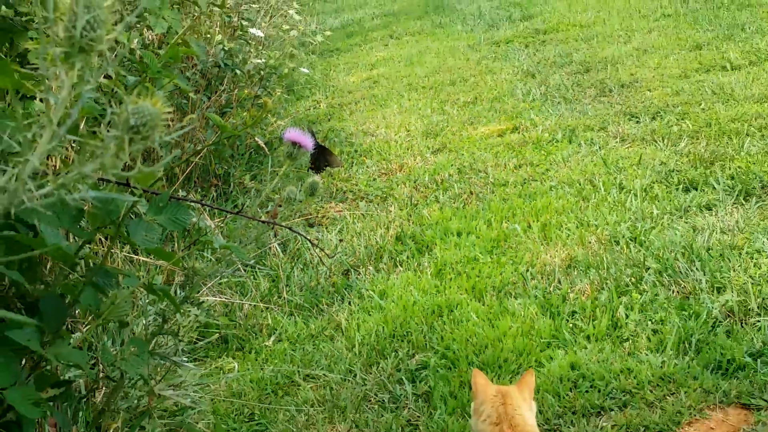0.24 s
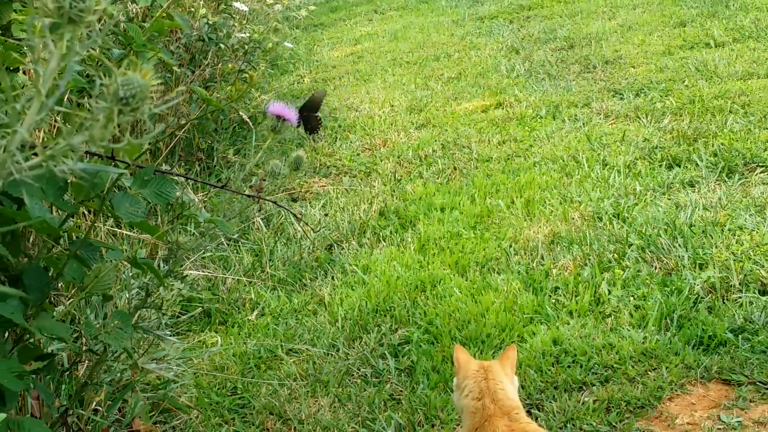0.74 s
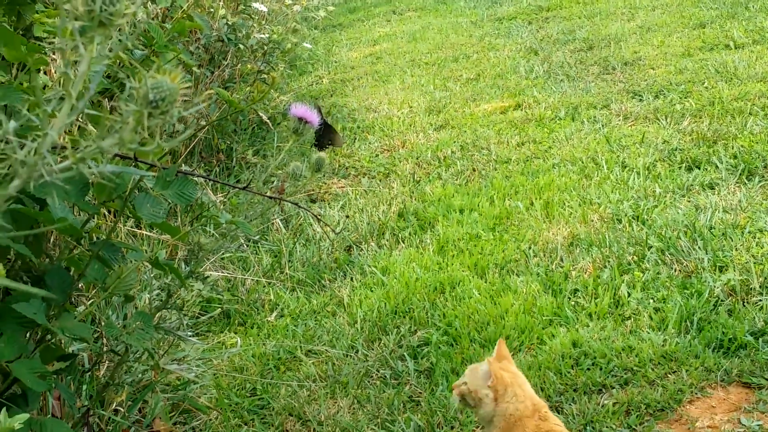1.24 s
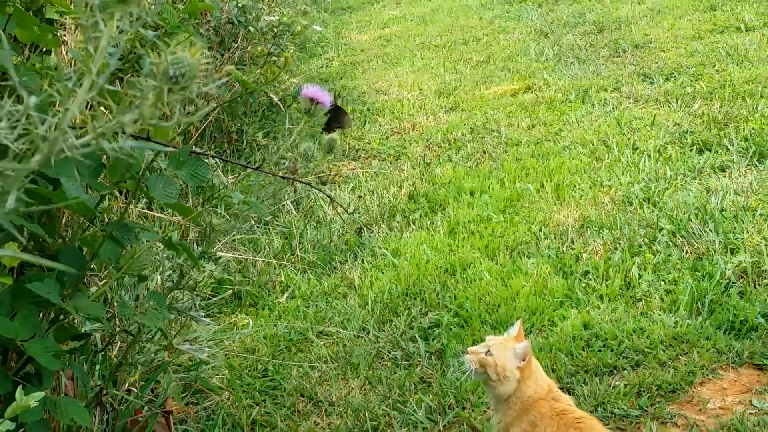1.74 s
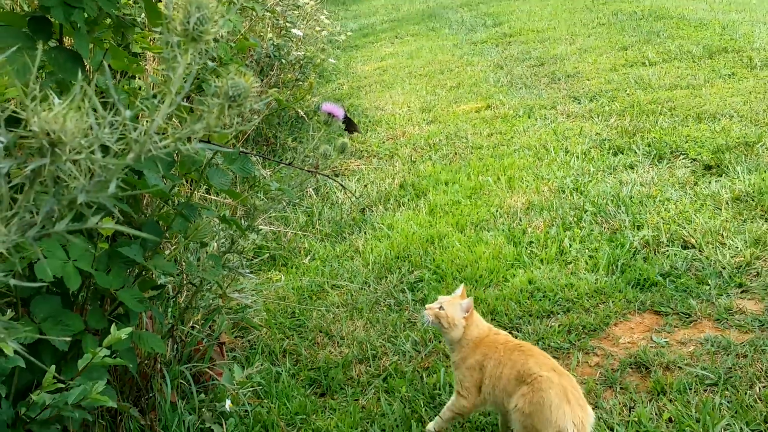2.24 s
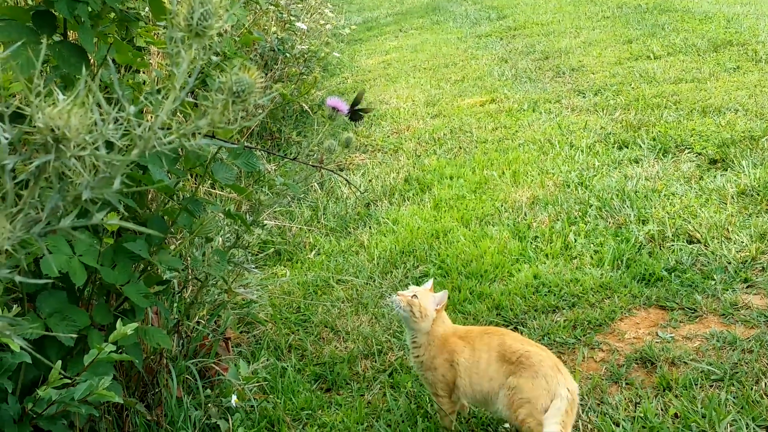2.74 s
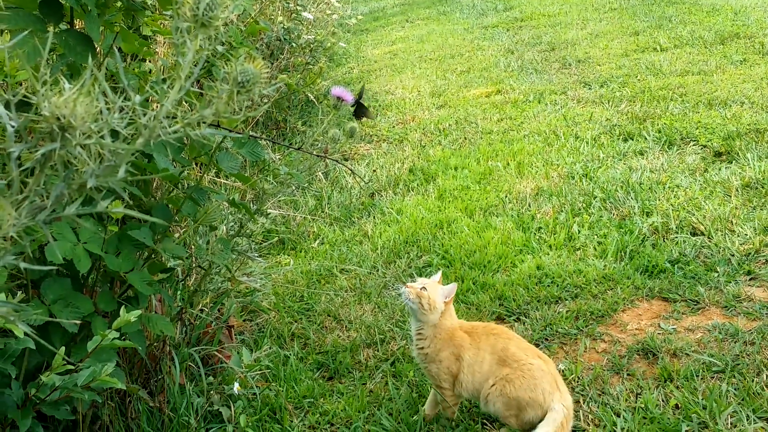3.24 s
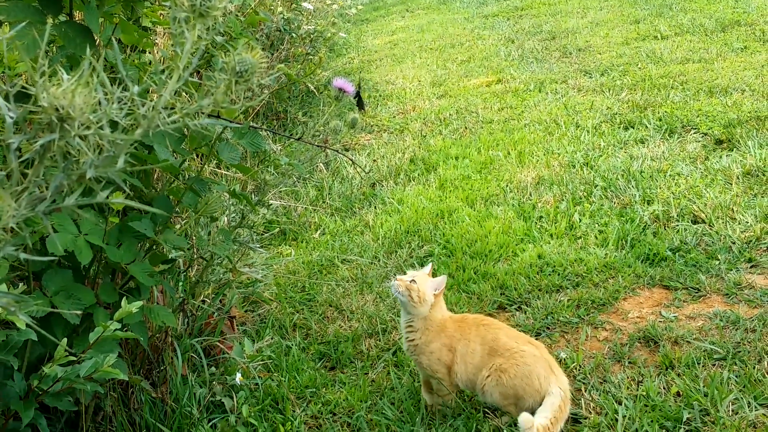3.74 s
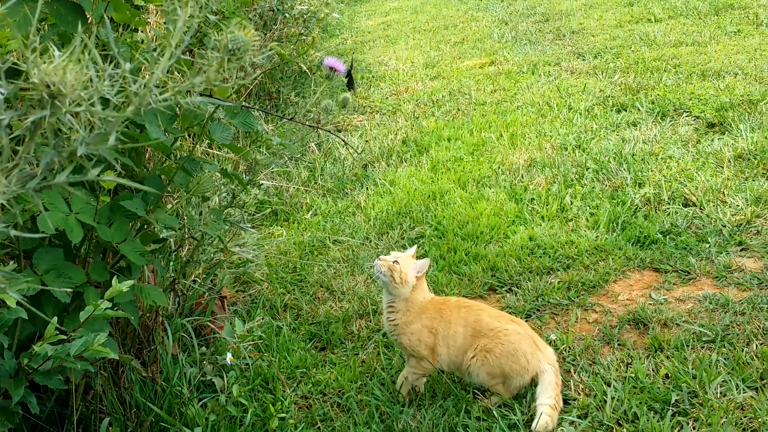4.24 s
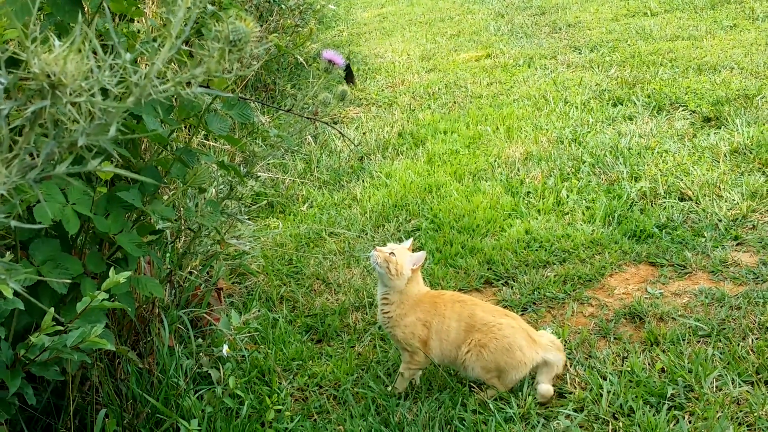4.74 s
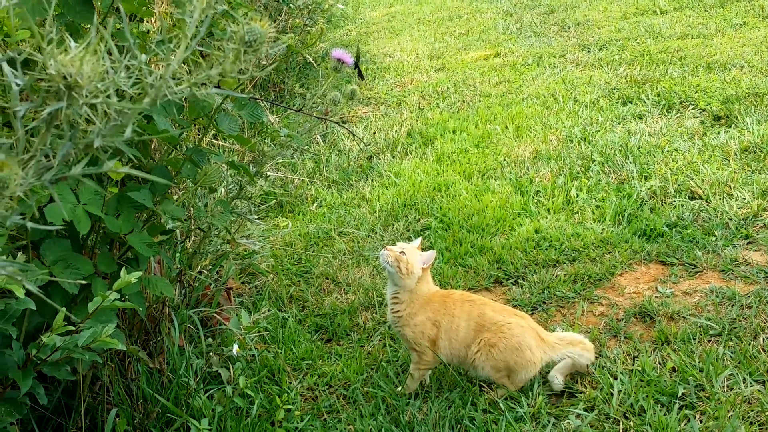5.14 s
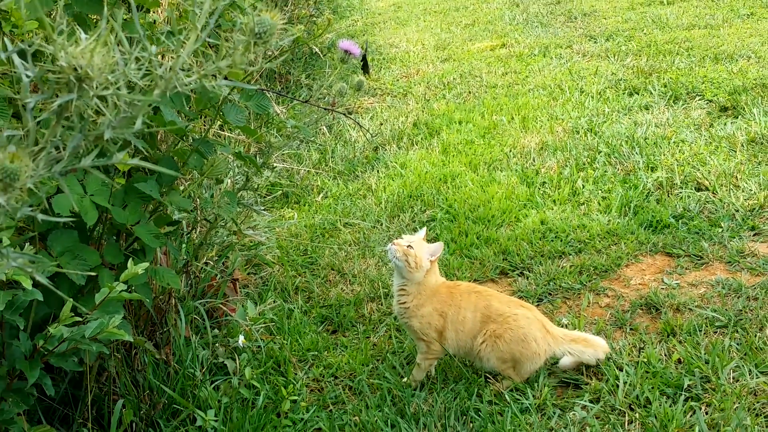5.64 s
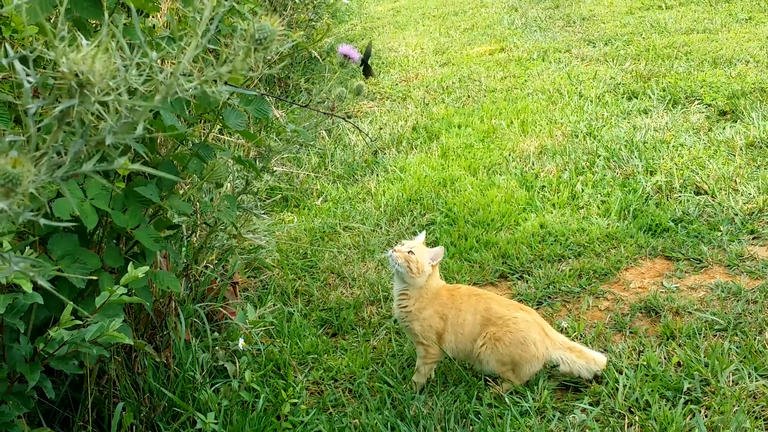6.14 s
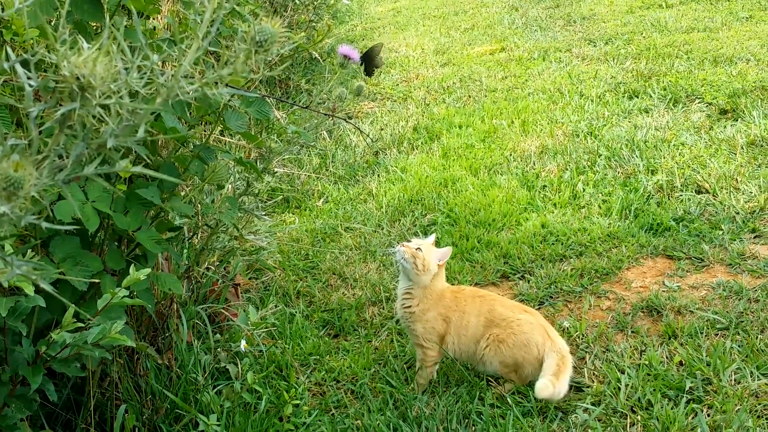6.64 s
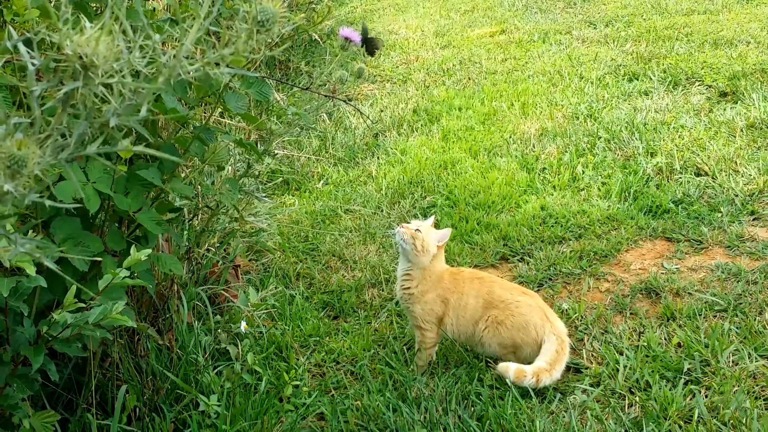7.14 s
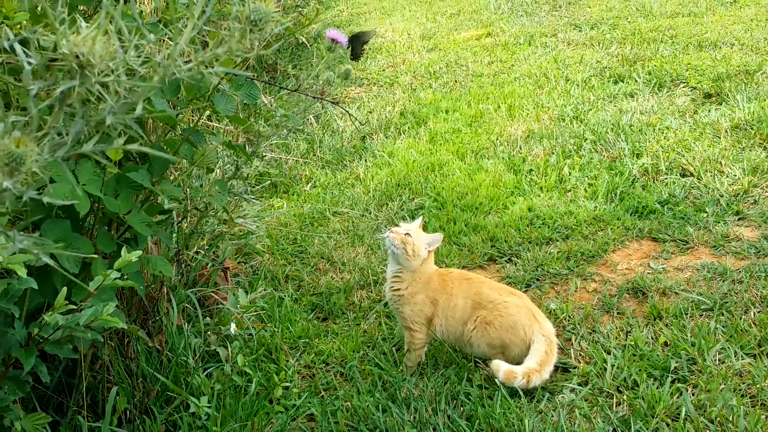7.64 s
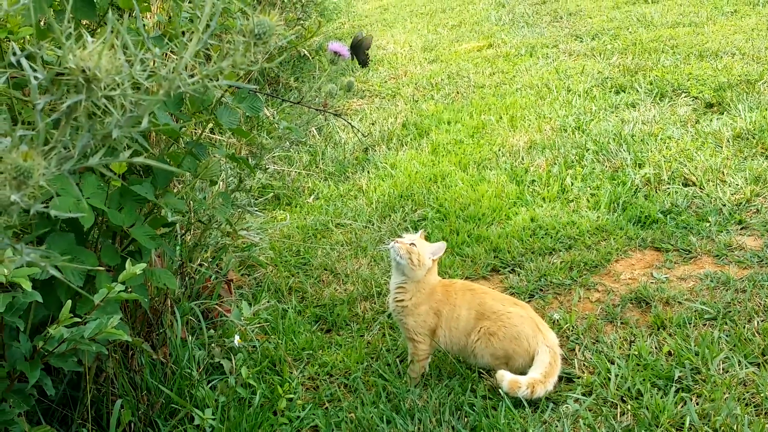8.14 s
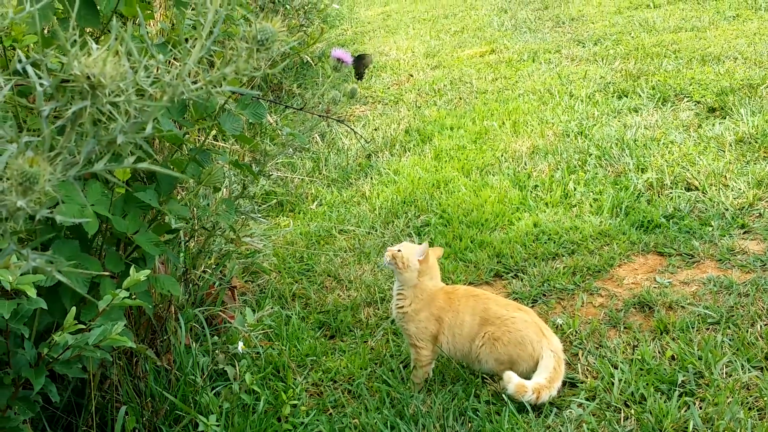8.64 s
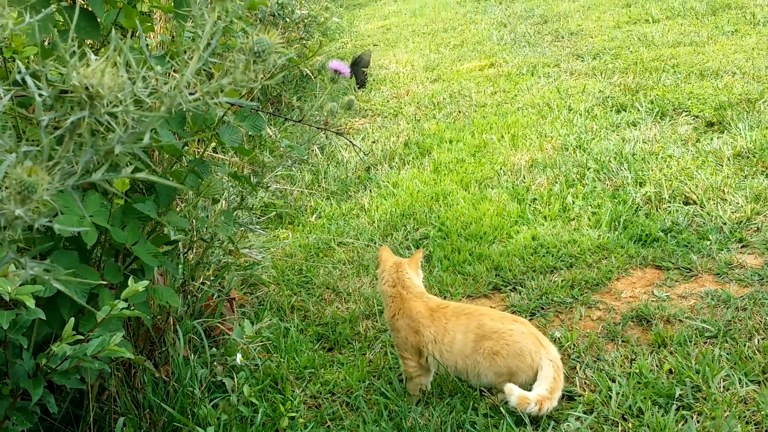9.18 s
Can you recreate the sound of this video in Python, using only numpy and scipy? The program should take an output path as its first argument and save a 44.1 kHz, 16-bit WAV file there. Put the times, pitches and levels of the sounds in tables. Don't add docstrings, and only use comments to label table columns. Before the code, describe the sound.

A bright, wide cicada drone lasts the whole 9.4 seconds above soft leaf hiss, low road rumble and a wavering distant engine. A near cricket trills very fast on the right, stopping from about 0.6 to 1.2 s, then continuing until about 9 s, weaker and less right-sided later. A buzzy insect beats quickly at 0-1.1 and 1.6-2.4 s; a slower one pulses from 3.3 s, quickening. Finger clicks strike the right of the microphone at 0.4-0.9 and around 1.45 s. At 1.1-1.5 s a close bird gives a rough, nasal mew with a short yard echo; a far one answers around 2.9-3.3 s. Thin high chips appear at 2.6, 4.3, 5.5 and 6 s, a sharp flick at 7 s, and more between 7.6 and 8.5 s. Dry stalks tick and rustle near 5.3 s, with isolated ticks later. Final clicks fall between 8.9 and 9.4 s.

```python
import sys
import numpy as np
from scipy import signal
from scipy.fft import rfft, irfft, next_fast_len
from scipy.io import wavfile
from scipy.ndimage import uniform_filter1d, map_coordinates

SR = 44100
rng = np.random.default_rng(int(sys.argv[2]) if len(sys.argv) > 2 else 0)


def level_to_linear(level):
    exponent = np.asarray(level, float) / 20
    return 10 ** exponent


def digitize_waveform(pressure):
    field = np.atleast_2d(pressure).T
    bounded = np.clip(field, -1, 1)
    quanta = np.round(bounded * 32767).astype(np.int16)
    wavfile.write(sys.argv[1], SR, quanta)


N = 414981


def unit(x):
    return x / np.sqrt(np.mean(x ** 2) + 1e-20)


def along(points, hz):
    f, v = np.transpose(points)
    return np.interp(np.log(hz + 1), np.log(f + 1), v)


def curves(rows, t=None):
    s, *cols = np.transpose(rows)
    return [np.interp(np.arange(N) / SR if t is None else t, s, c) for c in cols]


def wobble(rate, size=N):
    knots = rng.standard_normal(int(N * rate / SR) + 4)
    return map_coordinates(knots, [np.arange(size) * rate / SR])


def filtered(x, response):
    m = next_fast_len(N + SR // 2)
    return irfft(rfft(x, m) * response(np.fft.rfftfreq(m, 1 / SR)), m)[..., :N]


def sides(pan_db):
    gains = level_to_linear([[pan_db / 2], [-pan_db / 2]])
    return gains / gains.mean()


# pitch in Hz, likeness from -1 to 1.
LIKENESS = [(30, 0.91), (80, 0.87), (150, 0.86), (290, 0.71), (640, 0.8), (1400, -0.68), (3100, 0.11),
            (15000, -0.27)]


def rush(spectrum, patchy_db, pan=((1000, 0),)):
    z = signal.stft(rng.standard_normal((2, N)), nperseg=512)[2]
    field = rng.standard_normal(z.shape[1:])
    field = uniform_filter1d(uniform_filter1d(field, 6, 0), 10, 1)
    pair = signal.istft(z * level_to_linear(patchy_db * unit(field)), nperseg=512)[1][:, :N]

    def mid_side(hz):
        turn = np.arccos(np.clip(along(LIKENESS, hz), -1, 1)) / 2
        return level_to_linear(along(spectrum, hz)) * [np.cos(turn), np.sin(turn)]

    mid, side = filtered(pair, mid_side)
    both = np.array([mid + side, mid - side])
    both = filtered(both, lambda hz: level_to_linear(np.outer([.5, -.5], along(pan, hz))))
    return both / np.std(both.mean(0))


# pitch in Hz, level in dB per Hz.
RUMBLE_TONE = [(9, -26), (20, -5), (30, 2.5), (42, -3), (60, -1), (128, -12), (162, -16), (389, -18),
               (530, -28), (780, -51), (1320, -120)]
# pitch in Hz, level in dB per Hz.
TYRE_TONE = [(250, -15.5), (450, -3), (600, -8.5), (640, 2.5), (680, -3.5), (800, -1), (1050, -3.5),
             (1400, -9.5), (2500, -26)]
# time in seconds, level in dB.
PASSING_CARS = [
    (1.6, -61.5),
    (2.93, -74),
    (3.88, -66),
    (6.1, -68.5),
    (6.9, -63),
    (8.95, -60),
]


def road():
    t = np.arange(N) / SR
    half_width_s, tyre_floor_db = .2, -63.5
    passing = level_to_linear(tyre_floor_db) + sum(level_to_linear(db) / (1 + ((t - s) / half_width_s) ** 2)
                                       for s, db in PASSING_CARS)
    rumble = level_to_linear(-47 + 0.39 * wobble(2.38)) * rush(RUMBLE_TONE, patchy_db=1.0)
    return rumble + passing * rush(TYRE_TONE, patchy_db=2.0)


# time in seconds, load in dB.
ENGINE_LOAD = [(0, -57), (.7, -60.5), (.9, -53.5), (1.46, -57.5), (1.9, -66), (2.41, -60), (2.8, -53.5),
               (3.27, -66.5), (4.09, -54), (4.74, -55.5), (5.5, -57.5), (5.6, -52), (6.37, -51),
               (6.73, -54.5), (7.3, -47), (8.4, -54), (8.9, -49.5), (9.41, -49.5)]
# pitch in Hz, level in dB.
ENGINE_HUM = [(133, 0.5), (158, -8.5), (199.6, -12), (233, -14), (266, -7.5), (311.5, -12.5), (377, -15),
              (640, -21.5)]


def engine():
    t = np.arange(N) / SR
    hum = 0
    for hz, db in ENGINE_HUM:
        hum = hum + level_to_linear(db + 1.5 * wobble(5)) * np.sin(2 * np.pi * hz * t + 1.0 * wobble(3.))
    return level_to_linear(curves(ENGINE_LOAD)[0] + 1.0) * hum


# pitch in Hz, level in dB per Hz.
LEAF_TONE = [(900, -40), (1500, -1), (3000, -1.5), (9000, -9.5), (12000, -8.5), (15700, -6.5), (15850, -70)]


def leaves():
    t = np.arange(N) / SR
    start_db, fade_db_per_s = -56.5, -0.26
    gust_db = .6 * wobble(1.5)
    hiss = rush(LEAF_TONE, patchy_db=1.6, pan=[(2000, 0.0), (12000, -3.0)])
    return level_to_linear(start_db + fade_db_per_s * t + gust_db) * hiss


# time in seconds, level in dB.
CHORUS_LEVEL = [(0, -37.5), (.76, -39), (1.34, -35), (1.6, -37), (2.36, -37.5), (2.65, -37), (4, -37),
                (6.7, -35.5), (8.2, -36), (9.41, -36.5)]
# pitch in Hz, level in dB per Hz.
CHORUS_TONE = [(1290, -34.5), (2200, -35), (2660, -37), (2920, -32.5), (4370, -20), (4740, -19.5),
               (5170, -14), (5800, -9), (6120, -3.5), (6590, 2), (7340, -2.5), (7600, -4), (8120, -10.5),
               (8290, -15.5), (11000, -49.5), (14300, -76), (22000, -120)]
# pitch in Hz, left minus right in dB.
CHORUS_PAN = [(2500, -10), (4500, 0.5), (6500, -3), (7500, -10), (8500, -11.5), (11000, -32)]


def cicadas():
    loudness = level_to_linear(curves(CHORUS_LEVEL)[0] + 1.0 + 0.55 * wobble(6.))
    return loudness * rush(CHORUS_TONE, patchy_db=0.92, pan=CHORUS_PAN)


def beats(rows, rise, fall):
    t = np.arange(N) / SR
    return sum(level_to_linear(db) * np.exp(-np.abs(t - s) / np.where(t < s, rise, fall)) for s, db in rows)


# pitch in Hz, level in dB per Hz.
SLOW_TONE = [(2800, -39), (3500, -6.5), (4200, 2), (5200, 8.5), (6000, 5.5), (7500, -15)]


def slow_pulser():
    k = np.arange(17)
    first_s, gap_s, extra_gap_s = 3.265, .3, .153
    shrink = .87
    times = first_s + gap_s * k + extra_gap_s * (1 - shrink ** k) / (1 - shrink)
    level_db = -45 - 6 * .75 ** k
    swells = beats(zip(times, level_db), rise=0.077, fall=0.1)
    return swells * rush(SLOW_TONE, patchy_db=1.9, pan=[(4000, -7.5)])


# start in seconds, end in seconds, seconds per beat, level in dB.
FAST_BOUTS = [
    (0, 1.1, .1047, -51.5),
    (1.59, 2.4, 0.112, -50),
]


def fast_pulser():
    tone = [(3000, -25), (3600, -8), (4300, -7), (4950, 0), (5300, -14), (6200, -35)]  # Hz, dB
    pulses = [(s, db) for first, last, period, db in FAST_BOUTS for s in np.arange(first, last, period)]
    buzz = rush(tone, patchy_db=-3.5, pan=[(4200, -17), (4950, 10)])
    return beats(pulses, rise=0.032, fall=0.024) * buzz


# time in seconds, peak level in dB.
STALK_TICKS = [(.824, -46), (1.61, -44), (5.24, -29), (5.297, -42), (5.333, -38), (5.358, -28), (5.43, -42),
               (6.636, -34), (7.483, -28), (8.866, -42), (9.1578, -18)]
# time in seconds, level in dB, spread in seconds.
PAW_BRUSHES = [
    (5.3, -58, .1),
    (5.65, -60, .12),
    (6.35, -63, .15),
    (4.9, -68, .25),
]


def grass():
    out, t = np.zeros(N + SR), np.arange(200) / SR
    tick = np.sin(2 * np.pi * 10500 * t) * level_to_linear(-60 * t / 0.0014)
    for s, db in STALK_TICKS:
        out[round(s * SR):][:len(t)] += level_to_linear(db) * tick
    tone = [(7000, -28), (9000, 3), (12000, -10), (15700, -10), (15850, -70)]  # Hz, dB
    stalks = rush(tone, patchy_db=-4.5, pan=[(10000, -13)])
    brushing = sum(level_to_linear(db) * np.exp(-np.abs(np.arange(N) / SR - s) / spread)
                   for s, db, spread in PAW_BRUSHES)
    return sides(-14) * out[:N] + brushing * level_to_linear(3 * wobble(90.)) * stalks


# time in seconds, peak in dB, ring of the microphone port in dB,
# left minus right in dB, contact time in milliseconds.
FINGER_CLICKS = [(0.4487, -31, -40, -26, 1.1), (.83, -28.5, 8, -28, 0.56), (0.882, -16.5, -21, -35, 0.27),
                 (0.929, -17, -29, -38, 0.29), (1.426, -37, -30, -14, 0.94), (1.459, -32, -30, -19, 0.71),
                 (1.499, -28.5, 3, -22, 0.32), (1.514, -35, -12, -14, 0.51), (8.894, -26, 3, -25, 0.49),
                 (8.985, -33, -40, -14, 0.84), (9.1603, -15.5, 6, -32, 0.27), (9.1625, -28, 16, -30, 0.6),
                 (9.2216, -27.5, -40, -25, 0.71), (9.401, -37, -40, -23, 0.95)]


def clicks():
    out, t = np.zeros((2, N + SR)), np.arange(300) / SR
    ring = -np.sin(2 * np.pi * 7800 * t) * level_to_linear(-60 * t / 0.00097)
    ring += 0.15 * np.cos(2 * np.pi * 12500 * t) * level_to_linear(-60 * t / 0.00054)
    softness = .5
    for s, db, ring_db, pan_db, contact_ms in FINGER_CLICKS:
        u = 1000 * t / contact_ms
        rebound = 1.7 * u * np.exp(-(u / 1.3) ** 2)
        push = 12 * (u / .25) ** 1.5 * np.exp(-u / .11)
        skin = np.hanning(3 + round(softness * contact_ms * SR / 1000))
        thud = np.convolve(rebound - push, skin / skin.sum())[len(skin) // 2:][:len(t)]
        click = thud + level_to_linear(ring_db + 7.0) * ring
        out[:, round(s * SR):][:, :len(t)] += level_to_linear(db - 0.5) * sides(pan_db) * click
    return out[:, :N]


# start in seconds, length in seconds, first Hz, last Hz, peak level in dB.
WHISTLES = [
    (1.56, .1, 8390, 8130, -44),
    (2.555, 0.13, 8280, 8270, -36.5),
    (5.5, .11, 8640, 8220, -40),
    (6.025, 0.11, 8230, 8160, -33),
    (7.595, 0.076, 8600, 8480, -39.5),
    (7.64, 0.082, 8310, 8380, -31),
    (7.835, 0.077, 8430, 7990, -35.5),
    (8.45, 0.054, 8100, 8270, -33),
    (8.74, 0.14, 2440, 2520, -64.5),
]
# start in seconds, length in seconds, first Hz, last Hz, peak level in dB.
UP_FLICKS = [
    (4.262, .032, 5900, 8400, -33),
    (6.996, 0.031, 5500, 8470, -21),
]
# delay in milliseconds, level in dB.
HEDGE_ECHOES = [(1.3, -3), (2.9, -4), (4.6, -6), (7.1, -7), (11.3, -10)]


def chips():
    out, octave = np.zeros(N), level_to_linear(-28)
    for rows, flick in ((WHISTLES, False), (UP_FLICKS, True)):
        onset_db = -20 if flick else -13.5
        for s, length, first_hz, last_hz, db in rows:
            t = np.arange(round(length * SR)) / SR
            glide = 1 - np.exp(-t / 0.012) if flick else t / length
            swell_db = np.interp(t / length, [0, 0.52, 1], [onset_db, 0, -14.5])
            hz = first_hz + (last_hz - first_hz) * glide
            phase = 2 * np.pi * np.cumsum(hz) / SR + .5 * wobble(90, size=len(t))
            whistle = np.sin(phase) + octave * np.sin(2 * phase)
            whistle *= level_to_linear(db + swell_db + 7.5) * signal.windows.tukey(len(t), .2)
            out[round(s * SR):][:len(t)] += whistle
    echoes = sum(level_to_linear(db) * np.roll(out, round(ms * SR / 1000)) for ms, db in HEDGE_ECHOES)
    return level_to_linear(-3.0) * (out + echoes)


def strokes(lead, hz, width):
    stroke = (27 * np.arange(N) / SR + lead + .5) % 1
    shape = np.exp(-.5 * ((stroke - .5) / width) ** 2)
    shape = shape * level_to_linear(0.88 * wobble(27.) + 0.36 * wobble(250.))
    slip = 1.3 * wobble(25)
    sag_hz = 1800 * np.clip(stroke - .6, 0, 1) + 900 * np.clip(.36 - stroke, 0, 1)
    return unit(shape * np.sin(2 * np.pi * np.cumsum(hz - sag_hz) / SR + slip))


# time in seconds, right level in dB,
# left minus right in dB, how far the beat runs ahead in cycles.
NEAR_CRICKET = [(0, -34, -25, 0.24), (.57, -34.5, -23, -.05), (1.2, -46, -11, -0.27),
                (1.5, -38.5, -16, -.59), (1.8, -38, -18, -0.77), (2.7, -34.5, -23, -0.59),
                (3.9, -30, -21, -0.39), (4.8, -32.5, -17, -.4), (5.7, -34.5, -12, -.4),
                (6.3, -35, -11, -0.42), (6.7, -41.5, -3, -0.35), (7.5, -40.5, -3, -.45),
                (7.9, -53, 13, -0.13), (9, -45, 4.5, -0.46)]
# start in seconds, end in seconds.
SONG_BOUTS = [
    (0, .58),
    (1.17, 8.97),
]
# time in seconds, level in dB.
LOW_CRICKET = [(0, -43), (1.2, -69), (2.1, -63), (2.7, -42), (4, -50), (8.9, -49), (9.1, -60)]


def cricket():
    t = np.arange(N) / SR
    right_db, turn_db, lead = curves(NEAR_CRICKET)
    singing = uniform_filter1d(sum(1. * ((t >= a) & (t < b)) for a, b in SONG_BOUTS), size=900)
    restart = SONG_BOUTS[1][0]
    wing_hz = 7830 - np.where(t > restart, 400 * np.exp(-np.abs(t - restart) / .7), 0)
    near = singing * level_to_linear([right_db + turn_db, right_db]) * strokes(lead, wing_hz, width=0.2)
    neighbour = level_to_linear(curves(LOW_CRICKET)[0]) * strokes(lead - .15, 7655, width=0.45)
    return near + sides(-25) * neighbour


def mew(rows, rasp, voice):
    first, last = round(rows[0][0] * SR), round(rows[-1][0] * SR)
    t = np.arange(first, last) / SR
    pitch_hz, db, tilt_db = curves(rows, t)
    rough = curves(rasp, t)[0]

    def shake(rate):
        return wobble(rate, size=last - first)

    phase = 2 * np.pi * np.cumsum(pitch_hz) / SR + .15 * rough * shake(120)
    stack = 0
    for k, level in voice:
        clean = (1 - rough ** 2) * np.sin(k * phase)
        smear = shake(450) * np.sin(k * phase) + shake(450) * np.cos(k * phase)
        flutter = level_to_linear((2 + 4 * rough) * shake(50))
        tone = clean + rough * (.5 + k / 9) * smear
        stack = stack + level_to_linear(level + tilt_db * (k - 5)) * flutter * tone
    stack /= np.sqrt(uniform_filter1d(stack ** 2, size=500) + 1e-9)
    return np.pad(level_to_linear(db) * stack * signal.windows.tukey(last - first, .04), (first, N - last))


# time in seconds, pitch in Hz, level in dB, tilt in dB per overtone.
FAR_CALL = [
    (2.855, 860, -64, -7),
    (2.9, 890, -54, -8),
    (2.95, 850, -60, -3),
    (3.05, 830, -58, -1),
    (3.14, 815, -62, -1),
]
# multiple of the pitch, level in dB.
FAR_OVERTONES = [(3, -3), (4, -1), (5, 0)]
# time in seconds, pitch in Hz, level in dB, tilt in dB per overtone.
FAR_SECOND_HALF = [
    (3.11, 815, -54, .1),
    (3.13, 800, -51, .1),
    (3.17, 812, -54, .1),
    (3.23, 800, -50, .1),
    (3.265, 770, -56, .1),
    (3.28, 755, -70, .1),
]
# multiple of the pitch, level in dB.
SECOND_OVERTONES = [(3, -14), (4, -16), (5, 0), (6, -2)]
# time in seconds, roughness from 0 to 1.
FAR_ROUGHNESS = [(2.9, .15), (2.95, .6), (3.08, .75), (3.11, .12), (3.25, .12), (3.3, .7)]


def far_bird():
    call = mew(FAR_CALL, FAR_ROUGHNESS, FAR_OVERTONES)
    return call + mew(FAR_SECOND_HALF, FAR_ROUGHNESS, SECOND_OVERTONES)


# time in seconds, pitch in Hz, level in dB, tilt in dB per overtone.
NEAR_CALL = [
    (1.134, 660, -42, -4),
    (1.141, 690, -33, -4),
    (1.15, 830, -33, -3),
    (1.18, 826, -27, 0),
    (1.246, 820.2, -22, 0),
    (1.34, 792, -27, .2),
    (1.39, 762, -28, 0),
    (1.42, 744, -34, .9),
    (1.46, 738, -46, 2.5),
]
# time in seconds, roughness from 0 to 1.
NEAR_ROUGHNESS = [(1.145, .5), (1.165, .12), (1.26, .12), (1.3, .25), (1.335, .55), (1.4, .6)]
# multiple of the pitch, level in dB.
NEAR_OVERTONES = [(1, -50), (2, -22), (3, -16), (4, 1.5), (5, -11), (6, -8), (7, -2), (8, -6), (9, -21),
                  (10, -5), (11, -25), (12, -24.5), (13, -33), (14, -28), (15, -34), (16, -31), (17, -39),
                  (18, -44)]


def near_bird():
    return mew(NEAR_CALL, NEAR_ROUGHNESS, NEAR_OVERTONES)


# pitch in Hz, left minus right in dB.
HOUSING_SHADE = [(1600, 1), (2500, -16), (3300, -20), (8000, -18)]


def around_housing(x):
    lag_s = 0.181 / 1000
    return filtered(x, lambda hz: [level_to_linear(along(HOUSING_SHADE, hz)), np.exp(-2j * np.pi * hz * lag_s)])


# pitch in Hz, seconds to fall by 60 dB.
YARD_FADE = [(500, 0.18), (3000, 0.7), (8000, 0.48), (15000, 0.11)]


def yard(x):
    hz, t, z = signal.stft(rng.standard_normal((2, SR)), SR, nperseg=256)
    tail = signal.istft(z * level_to_linear(-60 * t / along(YARD_FADE, hz)[:, None]), SR, nperseg=256)[1]
    late = np.pad(x, (300, 0))[None]
    return signal.fftconvolve(late, tail / np.linalg.norm(tail[0]), axes=1)[:, :N]


def scene():
    background = road() + engine() + leaves() + cicadas()
    insects = slow_pulser() + fast_pulser()
    high, wings, far, near = chips(), cricket(), far_bird(), near_bird()
    birds = level_to_linear(5.5) * around_housing(near) + sides(-17) * far + sides(-22) * high
    to_yard = level_to_linear(-5) * near + .6 * far + level_to_linear(-6.5) * high + level_to_linear(-14) * wings.mean(0)
    echo = sides(-7) * yard(to_yard)
    return background + insects + grass() + clicks() + wings + birds + echo


def roll_off(x):
    return signal.sosfilt(signal.butter(12, 15790, fs=SR, output="sos"), x)


def record(dry):
    top, hard = .97, 8
    mix = dry / (1 + np.abs(dry / top) ** hard) ** (1 / hard)
    return roll_off(mix)


dry = scene()
out = record(dry)
digitize_waveform(out)
```